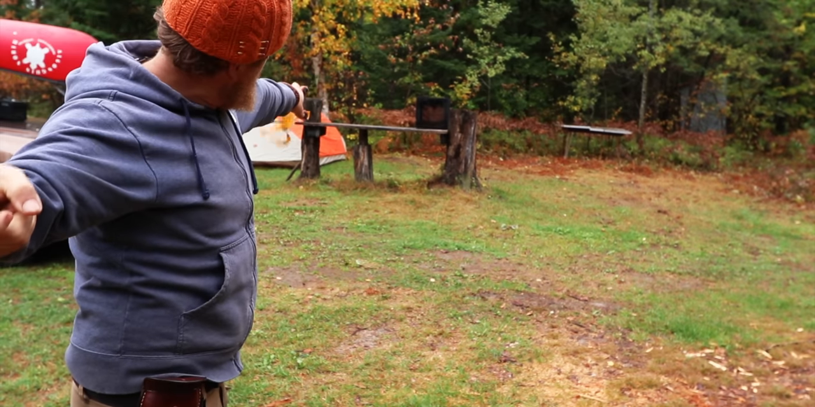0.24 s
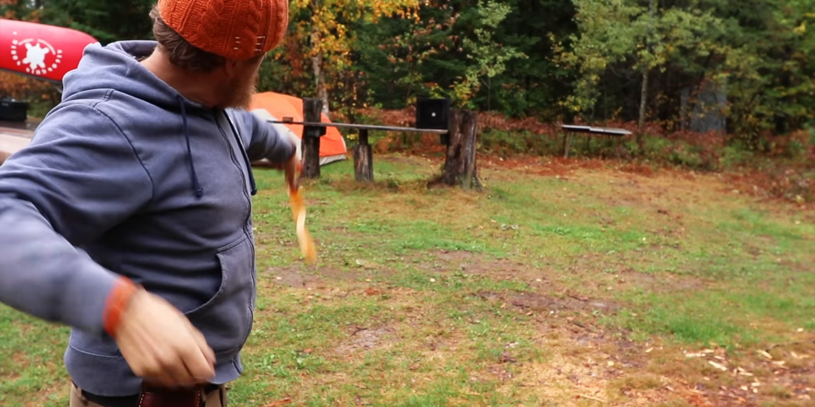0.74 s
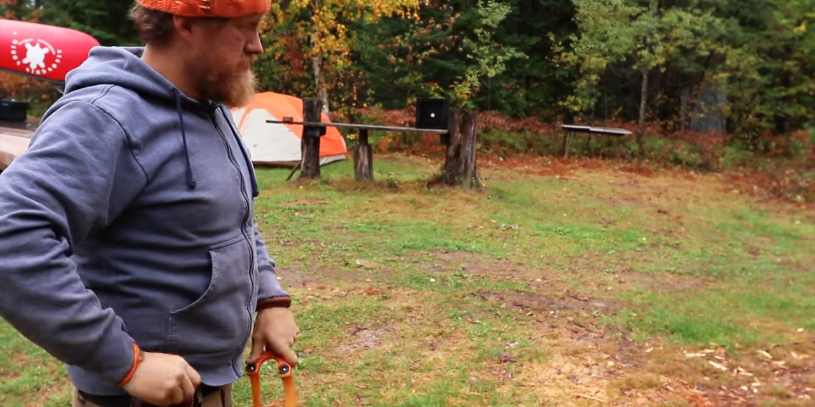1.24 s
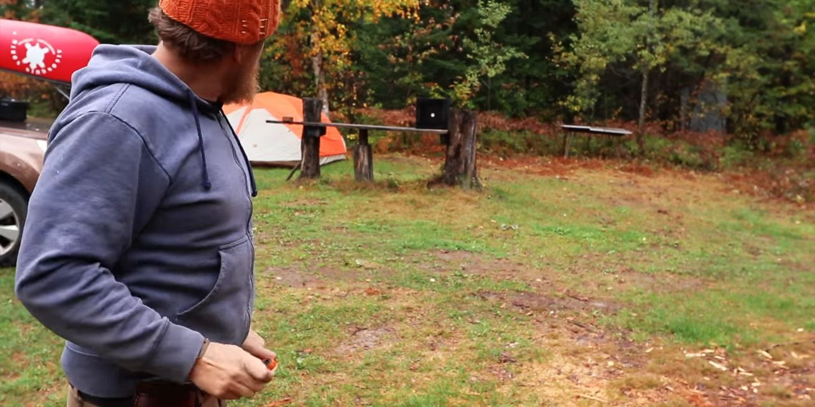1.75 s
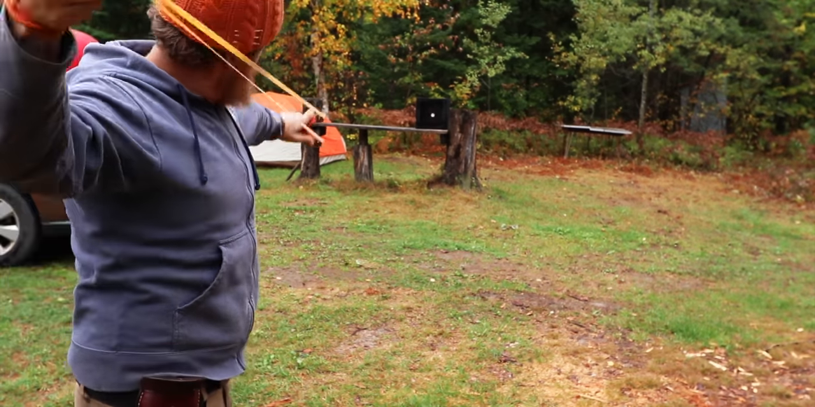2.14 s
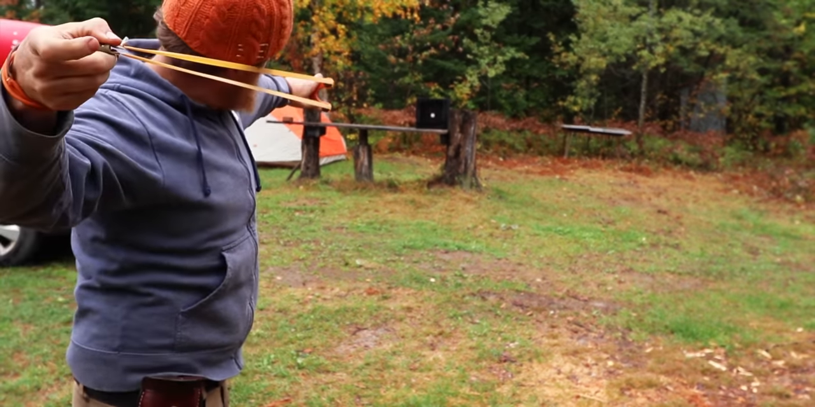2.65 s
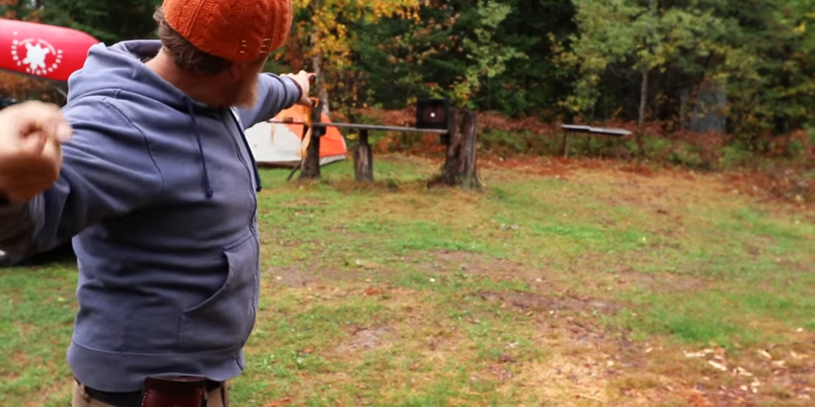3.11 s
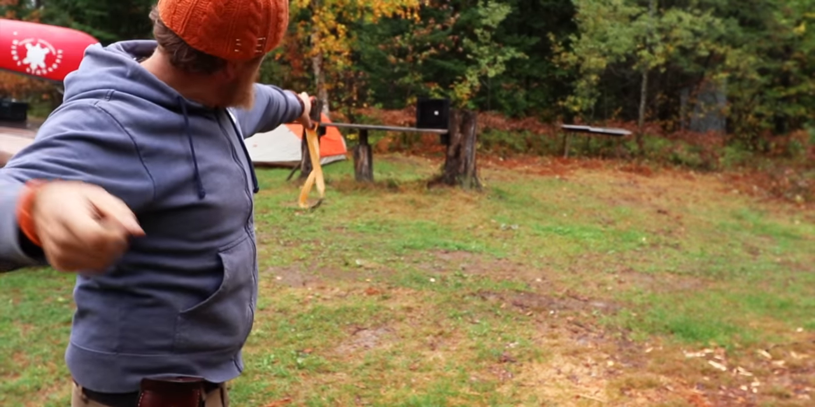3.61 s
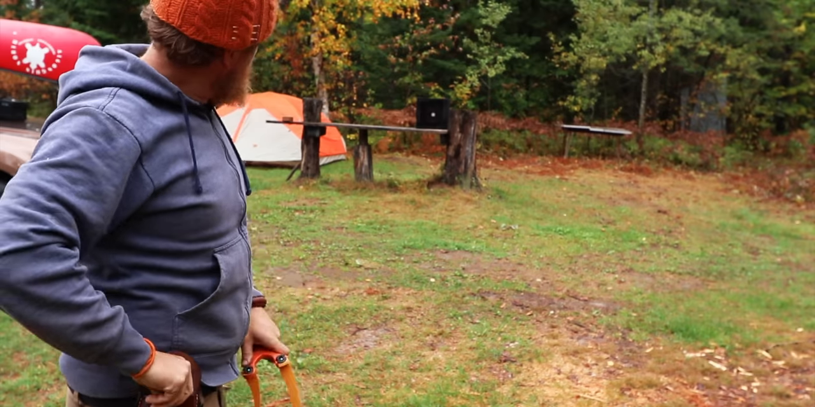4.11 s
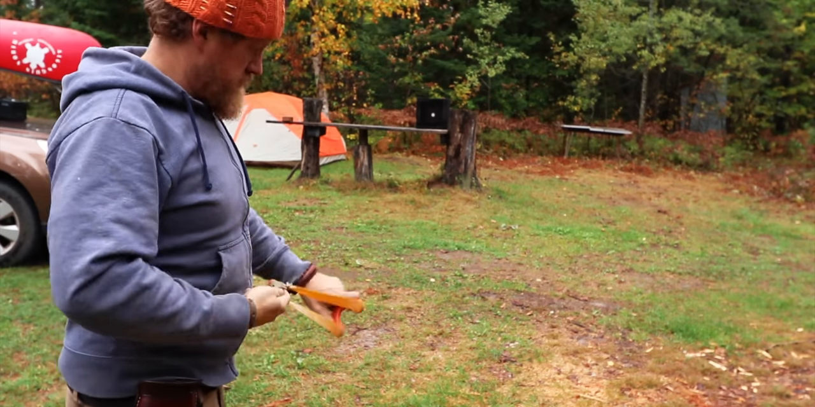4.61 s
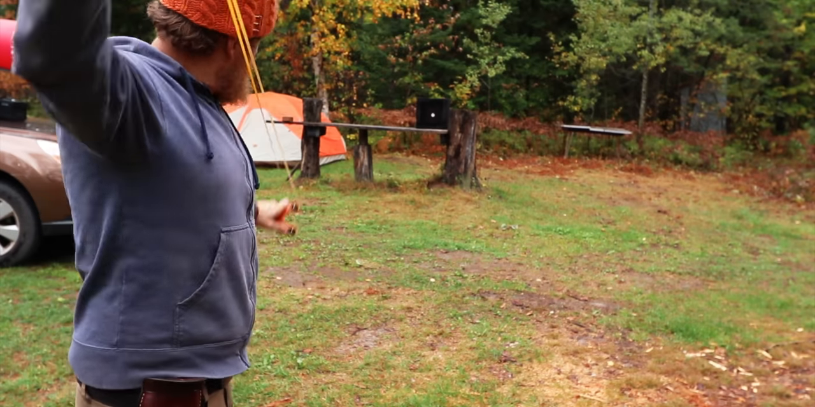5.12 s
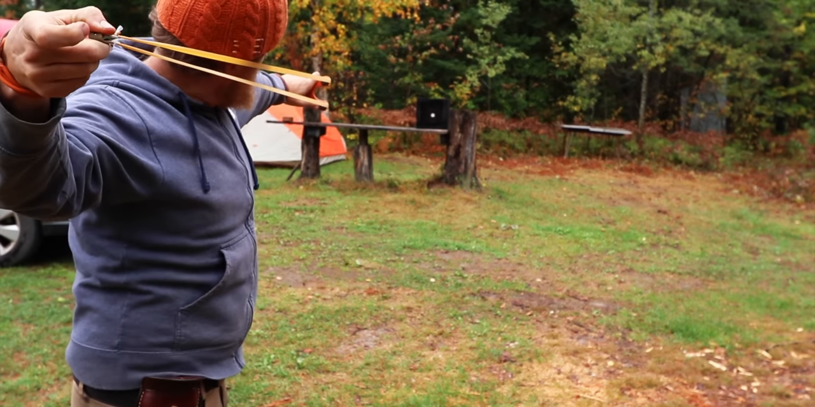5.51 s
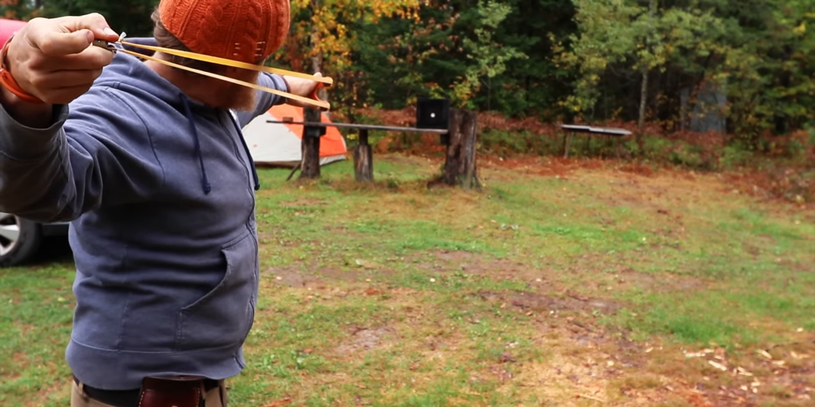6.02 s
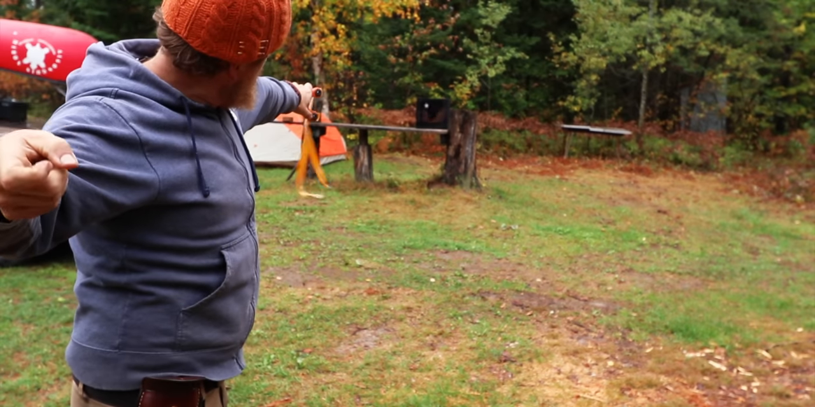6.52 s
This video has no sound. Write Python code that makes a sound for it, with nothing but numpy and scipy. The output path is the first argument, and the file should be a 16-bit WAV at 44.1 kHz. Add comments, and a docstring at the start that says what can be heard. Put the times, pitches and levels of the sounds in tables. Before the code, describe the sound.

Close beside a slingshot shooter in a quiet woodland clearing: bands whip and slap, then a ball cracks into a mesh target with a thud, drops in soft knocks, and the trees return a diffuse echo. Cloth rustles, ticks and bright clacks mark the reload before a second, heavier shot; another rustle, padded knocks and a faint rubber twang lead to a third. Centred sound, with the loud hits slightly overloading the microphone.

```python
"""Slingshot practice at a forest camp

Three shots, heard from just behind the shooter, alike in both channels. Coloured noise makes the bands
whip past the fork and slap again on the rebound; short pulses through resonances make the ball crack
into a mesh target and thud into its back, then it drops. A decaying noise echo from the trees follows.
Between shots, cloth rustles and the shooter reloads and draws with ticks, knocks and bright clacks."""
import sys
import numpy as np
from scipy import signal
from scipy.fft import rfft, irfft, next_fast_len
from scipy.io import wavfile
from scipy.ndimage import uniform_filter1d

SR = 44100
rng = np.random.default_rng(int(sys.argv[2]) if len(sys.argv) > 2 else 0)


def transcribe(u):
    """Save the signal u as a 16-bit wav file named by the first command-line argument.

    u: samples, shape (n,) or (channels, n), limited to [-1, 1]; the rate is SR.
    q: integer samples, one column per channel.
    """
    v = np.clip(np.atleast_2d(u).T, -1, 1)
    q = np.round(v * 32767).astype(np.int16)
    wavfile.write(sys.argv[1], SR, q)


N = 297675
T = np.arange(N) / SR
LEAD = SR // 16  # samples of room for an event's rise
AGE = (np.arange(SR // 3) - LEAD) / SR  # time axis of one event [s], 0 at its moment
BLOW = 1. * (AGE == 0)  # a single-sample impulse
PADDING_HZ = 3300  # cloth, skin and turf soak up the treble above this


def undb(db):
    """Decibels to gain."""
    return 10 ** (np.asarray(db) / 20)


def unit(x):
    """Scale to rms 1."""
    return x / np.sqrt(np.mean(x ** 2))


def peak(x, db):
    """Scale to a peak level."""
    return x * undb(db) / np.abs(x).max()


def match_energy(x, envelope):
    """Give a sound the same energy as its envelope."""
    return x * np.linalg.norm(envelope) / np.linalg.norm(x)


def add(out, s, x):
    """Mix an event into the track at time s."""
    start = int(round(s * SR)) - LEAD
    lo, hi = max(start, 0), min(start + len(x), N)
    out[lo:hi] += x[lo - start:hi - start]


def ring(x, hz, width):
    """Damped resonance with gain 1 at its centre."""
    w = 2 * np.pi * hz / SR
    a = np.sin(w) * width / hz / 2
    return signal.lfilter([a, 0, -a], [1 + a, -2 * np.cos(w), 1 - a], x + 1e-18)


def body(x, modes):
    """An object's modes driven by a force."""
    return sum(undb(db) * ring(x, hz, width) for hz, width, db in modes)


def soften(x, hz, order=2):
    """Take the edge off a contact with a low-pass."""
    return signal.sosfilt(signal.butter(order, hz, fs=SR, output="sos"), x)


def grit(rough_db=3):
    """One event's worth of tiny contacts of uneven size, at rms 1."""
    size = np.repeat(rng.standard_normal(len(AGE)), 12)[:len(AGE)]
    return unit(rng.standard_normal(len(AGE)) * undb(rough_db * np.clip(size, -2, 2)))


def colour(x, points):
    """Give noise a spectrum drawn through (frequency [Hz], level [dB]) points, at rms 1."""
    hz, db = np.transpose(points)
    size = next_fast_len(len(x))
    f = np.maximum(np.fft.rfftfreq(size, 1 / SR), 1)
    gain = undb(np.interp(np.log(f), np.log(hz), db))
    return unit(irfft(rfft(x, size) * gain, size)[:len(x)])


def swell(rise, fall, shift=0):
    """Exponential rise to the event's moment, put off by shift, and decay after it."""
    age = AGE - shift
    return np.exp(np.minimum(age / rise, -age / fall))


def walk(rate):
    """Random levels held 1 / rate s and slewed twice, at rms 1 or near it."""
    k = int(SR / rate)
    steps = np.repeat(rng.standard_normal(N // k + 1), k)
    return unit(uniform_filter1d(uniform_filter1d(steps, k), k)[:N])


def grounded(x, share, dull_hz):
    """Direct sound plus its duller bounce off the ground."""
    pole = np.exp(-2 * np.pi * dull_hz / SR)
    late = np.interp(AGE - .001037, AGE, x)
    return x + share * signal.lfilter([1 - pole], [1, -pole], late)


def tick(db, hz):
    """A dry tick with a trace of scratch."""
    scratch = 0.098 * grit() * swell(.0003, 0.0014)
    return peak(ring(BLOW + scratch, hz, .7 * hz), db)


# spectrum of the outdoor hiss: (frequency [Hz], level [dB])
WOODS_SPECTRUM = [(25, -21.5), (60, -6), (120, -2), (300, -4), (700, -8), (1300, -14.5), (3000, -17),
                  (5500, -25), (14000, -26.5), (16000, -29)]
# gain on the middle of the hiss: (time [s], gain [dB])
HISS_MIDDLE = [(0, -56), (1.8, -55.5), (2.6, -58.5), (4.9, -55.5), (5.7, -60), (6.75, -52)]
# distant low drone, before its small wander: (time [s], level [dB])
DRONE = [(0, -58), (1.4, -59.5), (2.3, -63.5), (3.6, -63.5), (5, -81.5), (6.75, -61)]


def woods():
    """Quiet outdoor hiss with a far, low drone that slowly fades and returns."""
    air = colour(rng.standard_normal(N), WOODS_SPECTRUM)
    # the middle of the hiss drifts; its treble stays even
    middle = ring(air, 500, 2500)
    hiss = middle * undb(np.interp(T, *np.transpose(HISS_MIDDLE))) + (air - middle) * undb(-54.5)
    drone = unit(ring(ring(rng.standard_normal(N), 330, 100), 320, 400))
    drone_db = np.interp(T, *np.transpose(DRONE)) + 1.2 * walk(10)
    return hiss + drone * undb(drone_db)


# echo from the trees: (band centre [Hz], gain [dB], time to fall 60 dB [s])
TREE_BANDS = [(125, -31.5, 1.2), (250, -24, 1.8), (491, -17, 2.3), (1000, -18.5, 1.5), (2020, -20.5, 1.3),
              (4000, -18, .85), (8000, -12, 0.85)]


def trees(x):
    """Many trunks scatter the sound back unevenly; the echo builds up late and loses its treble first."""
    t = T[:SR * 3 // 2]
    trunks = undb(2 * walk(130)[:len(t)])
    build_up = 1 - np.exp(-(t / .04) ** 2)
    echo = 0
    for hz, db, t60 in TREE_BANDS:
        scatter = rng.standard_normal(len(t)) * trunks * undb(1.5 * walk(240)[:len(t)])
        tail = scatter * build_up * np.exp(-np.log(1000) * t / t60)
        echo = echo + undb(db) * ring(ring(tail / np.linalg.norm(tail), hz, hz), hz, hz)
    return signal.fftconvolve(x, echo)[:N]


# spectrum of the rustling fabric: (frequency [Hz], level [dB])
CLOTH_SPECTRUM = [(200, -8), (450, -4), (850, 5), (1300, -0.5), (2100, -1.5), (3200, -9.5), (5000, -22),
                  (12000, -29)]
# strokes of sleeve and hand over cloth: (start [s], length [s], level [dB])
CLOTH_STROKES = [(0.884, 0.011, -46), (1.035, 0.046, -49.5), (1.129, 0.016, -47.5), (3.945, 0.026, -45.5),
                 (4.092, 0.062, -45), (4.46, 0.011, -50)]


def cloth(attack_s=.012, release_s=.041):
    """Fabric catches and slips as the hand digs for the next ball; strokes build, hold and die away."""
    speed = np.zeros(N)
    for s, length, db in CLOTH_STROKES:
        slope = np.minimum((T - s) / attack_s, (s + length - T) / release_s)
        speed += undb(db) * np.exp(np.minimum(slope, 0))
    catches = undb(2.5 * np.tanh(walk(90)) + 4 * np.tanh(walk(350)))
    return speed * colour(rng.standard_normal(N) * catches, CLOTH_SPECTRUM)


def fidgets(count=40, ticks_per_s=2.5, mean_db=-39, spread_db=3, centre_hz=5500):
    """Faint ticks at uneven intervals as fingers shift on pouch and fork."""
    out, s = np.zeros(N), 0
    for gap, size, pitch in rng.uniform(-1, 1, (count, 3)):
        s += (1 + gap) / ticks_per_s
        click = tick(mean_db + spread_db * size, centre_hz * 2 ** (.4 * pitch))
        if s < T[-1]:
            add(out, s, click)
    return out


def bump(s=5.556, db=-44):
    """A soft, low bump as the aim settles: noise through two low resonances."""
    out = np.zeros(N)
    low = unit(ring(ring(rng.standard_normal(len(AGE)), 200, 130), 230, 220))
    add(out, s, undb(db) * low * swell(0.0051, 0.029))
    return out


# modes of the fork held in the fist: (frequency [Hz], width [Hz], gain [dB])
FORK_MODES = [(135.4, 90, 5), (474, 170, 4), (854, 220, -3.5), (1120, 210, -7.5), (1520, 110, -2),
              (2020, 154, -4), (2270, 110, -2), (3070, 90, -2.5), (3760, 140, -8)]


def rap(db, hz, fall):
    """A short run of padded contacts rings the fork."""
    envelope = swell(0.00016, fall)
    force = soften(ring(grit() * envelope, hz, 2.9 * hz), PADDING_HZ, order=3)
    return undb(db) * match_energy(body(force, FORK_MODES), envelope)


# the clearer dry ticks of ball, pouch and fork: (time [s], peak [dB], centre [Hz])
DRY_TICKS = [(1.145, -33.5, 5040), (1.24, -32, 6500), (1.543, -31.5, 4800), (1.708, -24.5, 3260),
             (1.9708, -19.5, 1685), (2.463, -28.5, 5500), (3.648, -21, 5600), (4.8749, -28, 1940),
             (5.2655, -28.5, 3640), (5.884, -29, 3160)]
# padded knocks of hand and pouch on the fork: (time [s], level [dB], brightness [Hz], fall [s])
PADDED_KNOCKS = [(2.385, -37.5, 700, 0.00616), (2.412, -39, 300, 0.0066), (4.418, -29.5, 895, 0.0035),
                 (4.447, -40, 1000, 0.022), (4.498, -36, 338, 0.025), (4.7243, -33, 2000, 0.011),
                 (4.8078, -30, 460, 0.013)]
# twang of the stretched bands: (time [s], peak [dB])
BAND_TWANGS = [(5.266, -40), (5.293, -29)]
# modes of the tight rubber: (frequency [Hz], width [Hz], gain [dB])
TIGHT_BAND_MODES = [(387, 31, 5.5), (450, 18, -15), (833, 17, -10), (1200, 14, -6), (1547, 13, -1),
                    (2060, 11, -10), (2848, 9.7, -8), (3150, 15, -21)]


def handling():
    """Dry ticks, padded knocks and the twang of tight rubber, plucked through narrow modes."""
    out = np.zeros(N)
    for s, db, hz in DRY_TICKS:
        add(out, s, tick(db, hz))
    for s, db, hz, fall in PADDED_KNOCKS:
        add(out, s, rap(db, hz, fall))
    for s, db in BAND_TWANGS:
        pluck = BLOW + 0.028 * grit() * swell(0.0027, 0.033)
        add(out, s, peak(body(pluck, TIGHT_BAND_MODES), db))
    return out


# bright clacks while the bands are handled and drawn:
# (time [s], level [dB], rise [s], fall [s], tick peak [dB], boost of the modes below 2500 Hz [dB])
BRIGHT_CLACKS = [(1.596, -48.5, .002, 0.019, -52, -14), (1.628, -32.5, .003, 0.018, -35, 9.5),
                 (1.691, -37.5, .002, 0.0018, -50, -8.5), (2.2723, -13, .00014, .012, -41, 3.5),
                 (2.3296, -18, .0016, 0.012, -30, 4)]
# their modes, before that boost: (frequency [Hz], width [Hz], gain [dB])
BRIGHT_MODES = [(308, 70, 5), (700, 700, -10), (1320, 260, -6), (2050, 250, -7.5), (2855, 97, 5.5),
                (3190, 130, 2), (3480, 320, 8), (4060, 55, 12.5), (4400, 440, 0), (5100, 230, 1.5),
                (5700, 400, -5), (9440, 3000, -17.5)]


def clacks():
    """A tick and a fast-dying chatter ring a cluster of bright modes; some scraping is heard directly."""
    out = np.zeros(N)
    contact = ring(BLOW, 3800, 3000)
    for s, db, rise, fall, tick_db, low_db in BRIGHT_CLACKS:
        modes = [(hz, width, gain + low_db * (hz < 2500)) for hz, width, gain in BRIGHT_MODES]
        envelope = swell(rise, fall)
        force = grit() * envelope
        scrape = ring(ring(force, 3500, 4500), 3600, 6000)
        scrape_db = -35 - .6 * db  # light touches scrape more
        chatter = ring(body(force, modes) + undb(scrape_db) * scrape, 2000, 11000)
        chatter = match_energy(soften(chatter, 5800), envelope)
        add(out, s, undb(db) * chatter + peak(contact, tick_db))
    return out


def knock(db, hz, fall):
    """Contact noise round the knock's own pitch, over a hollow low body."""
    scuff = ring(ring(grit(rough_db=3.5), hz, hz), hz, 1.36 * hz)
    scuff = unit(soften(scuff, PADDING_HZ, order=3))
    thump = unit(body(ring(grit(), 220, 420), [(158.5, 210, 11.5), (464, 220, -21.0)]))
    thump_gain = undb(-10) * 1000 / hz  # duller knocks sound more hollow
    return undb(db) * (scuff + thump_gain * thump) * swell(.0012, fall)


# the spent ball tumbles down the backing and lands: (time [s], scuff level [dB], centre [Hz], fall [s])
BALL_DROPS = [(.313, -43, 322, 0.028), (.425, -37.5, 2780, 0.012), (.512, -43.5, 800, 0.011),
              (3.306, -37.5, 390, 0.031), (3.489, -29, 1060, 0.0093), (6.651, -25.5, 1000, 0.0055)]


def drops():
    """After each hit the spent ball tumbles to the ground in soft knocks."""
    out = np.zeros(N)
    for s, db, hz, fall in BALL_DROPS:
        add(out, s, knock(db, hz, fall))
    return out


# spectrum of the shivering mesh: (frequency [Hz], level [dB])
SHIVER_SPECTRUM = [(60, -5.5), (150, -2), (330, 1.5), (650, 1.5), (1000, -11), (1700, -2), (2700, -2),
                   (4000, -10.5), (8000, -19), (16000, -33.5)]


def mesh(length=0.132):
    """The mesh shivers in uneven jolts for a moment after each hit, then hangs still."""
    out = np.zeros(N)
    for s, _, _, stop, thud_db, _ in BALL_HITS:
        hang_still = np.clip((length - AGE) / 0.0042, 0, 1)
        shaking = swell(.02, 0.64, shift=0.032) * hang_still * (AGE > 0)
        jolts = undb(2 * np.tanh(unit(uniform_filter1d(grit(), size=400))))
        shiver_db = -37 + .6 * thud_db  # a stronger thud shakes it more
        shiver = colour(grit(rough_db=5), SHIVER_SPECTRUM) * shaking * jolts
        add(out, s + stop, undb(shiver_db) * shiver)
    return out


# the ball cracks into the mesh and is stopped by the backing, whose tension depends on the spot:
# (time [s], crack gain [dB], crack gain to the trees [dB], time to stop [s],
#  thud peak before recoil and flap [dB], pitch factor of the modes above 400 Hz [ratio])
BALL_HITS = [(.1753, 5.5, 10, 0.0036, -11, 1.3), (3.1456, 6, -1, 0.0068, 3, 0.96),
             (6.3152, 5.5, -16, .008, 4.5, 0.99)]
# target modes before tension and hardness: (frequency [Hz], width [Hz], gain [dB])
TARGET_MODES = [(90, 45, 0.5), (142, 82, 5.5), (258, 76, 3.5), (571, 150, 7.5), (1540, 400, -19.5)]


def target():
    """A short crack, then thud and flap of the slack backing: as heard, and as sent to the trees."""
    heard, sent = np.zeros(N), np.zeros(N)
    # a cycle and a half
    pulse = peak(ring(ring(-BLOW, 2400, 1900), 1500, 2800), 0) - undb(-15.5) * BLOW
    push = ring(ring(-BLOW, 400, 1700), 700, 5500)
    # the backing snaps taut again just after the blow
    late_blow = np.interp(AGE - .0021, AGE, BLOW)
    recoil = peak(ring(ring(late_blow, 800, 1200), 800, 2000), -11.5)
    for s, crack_db, sent_db, stop, thud_db, tension in BALL_HITS:
        buzz = undb(-26) * unit(ring(grit(), 2000, 2500)) * swell(.0001, .006)
        add(heard, s, undb(crack_db) * grounded(pulse + buzz, share=.65, dull_hz=4500))
        add(sent, s, undb(sent_db) * pulse)
        # a harder stop reaches the upper modes
        hardness_db = -3.5 + .73 * thud_db
        modes = [(hz * tension, width, gain + hardness_db) if hz > 400 else (hz, width, gain)
                 for hz, width, gain in TARGET_MODES]
        thud = peak(body(push, modes), 0)
        flap = undb(-17.5) * unit(body(grit(), modes)) * swell(.0004, 0.0092, shift=0.00073)
        add(heard, s + stop, undb(thud_db) * (thud + undb(hardness_db) * recoil + flap))
        add(sent, s + stop, peak(ring(push, 450, 1100), thud_db + 1.5))
    return heard, sent


# spectrum of the flapping rubber: (frequency [Hz], level [dB])
RUBBER_SPECTRUM = [(90, -21), (170, 4), (300, -2), (550, 1.5), (950, -4), (1400, -5), (2600, -4),
                   (3500, -7.5), (5300, -12), (7000, -19.5), (9000, -21.5), (16000, -27)]
# spectrum of the lash at full speed: (frequency [Hz], level [dB])
LASH_SPECTRUM = [(500, -12), (1500, -4), (3500, 7), (7000, -7), (10000, -2.5), (13000, 2.5), (16000, -13)]
# air stirred by the slack, flapping bands: (frequency [Hz], width [Hz], gain [dB])
AIR_MODES = [(224, 80, -10), (520, 260, -24.5)]


def snap(db, rise, fall, lash_db, slap_db, air_db):
    """Rubber rushes through the air, flaps, lashes at full speed, and the pouch slaps."""
    slap = grounded(ring(ring(BLOW, 1800, 1700), 2100, 7000), share=.6, dull_hz=5000)
    flap_envelope = swell(rise, fall) + undb(-16.5) * swell(0.0053, 0.023)
    flap = colour(grit(rough_db=-3.5), RUBBER_SPECTRUM) * flap_envelope
    lash = colour(grit(), LASH_SPECTRUM) * swell(0.00047, 0.0019)
    # the air is pushed aside before the rubber pulls taut
    sweep = swell(0.0059, 0.023, shift=-0.024)
    air = body(ring(rng.standard_normal(len(AGE)) * sweep, 240, 500), AIR_MODES)
    air = match_energy(air, sweep)
    return undb(db) * flap + undb(lash_db) * lash + undb(air_db) * air + peak(slap, slap_db)


# the pouch slips from the fingers: (time [s], peak of the bright tick [dB])
POUCH_RELEASES = [(2.968, -25), (6.1463, -7.5)]
# the two bands whip past the fork, one just after the other:
# (time [s], flap level of the leading band [dB], lag of the second band [s],
#  stirred air before each band's own offset [dB])
BAND_WHIPS = [(0.0296, -17, 0.0043, -30.5), (3.0023, -18.5, .005, -38), (6.1723, -18, .0074, -33.5)]
# they fly back and slap the fork:
# (time [s], flap level [dB], length [s], slap peak [dB], stirred air [dB])
BAND_REBOUNDS = [(0.081, -16.5, 0.015, -2, -24), (3.0503, -15, 0.012, 4, -42.5),
                 (6.219, -9, 0.0049, -1, -29.5)]


def bands():
    """The pouch is let go, the two bands whip forward, and they slap back."""
    out = np.zeros(N)
    for s, db in POUCH_RELEASES:
        # a bright tick, then a duller one of leather
        add(out, s, tick(db, 11500))
        add(out, s + .0044, tick(db - 5.5, 4200))
    for s, db, lag, air_db in BAND_WHIPS:
        leading = snap(db, rise=.0088, fall=.007, lash_db=-12, slap_db=-11, air_db=air_db - 5.5)
        trailing = snap(db, rise=.00078, fall=.016, lash_db=-12, slap_db=-14, air_db=air_db + 4)
        add(out, s, leading)
        add(out, s + lag, undb(-1) * trailing)
    for s, db, length, slap_db, air_db in BAND_REBOUNDS:
        rise = .28 * length
        add(out, s, snap(db, rise, length - rise, -14.5, slap_db, air_db))
    return out


def scene():
    """All sources with their share of echo, alike in both channels."""
    whip = bands()
    small = clacks() + handling() + drops() + bump() + cloth() + fidgets()
    hits, sent = target()
    echo = trees(sent + undb(-2.5) * whip + undb(-18) * small)
    mono = whip + small + hits + mesh() + echo + woods()
    return np.array([mono, mono])


def record(dry):
    """The microphone thins the deep bass; each input adds faint hiss; the hits overload it; the top is cut."""
    thinned = signal.sosfilt(signal.butter(1, 45, "high", fs=SR, output="sos"), dry)
    hiss = undb(-61) * rng.standard_normal(dry.shape)
    clipped = np.clip(thinned + hiss, -.97, .97)
    top_cut = signal.ellip(8, .2, 70, 15900, fs=SR, output="sos")
    return signal.sosfilt(top_cut, clipped)


dry = scene()
out = record(dry)
transcribe(out)
```